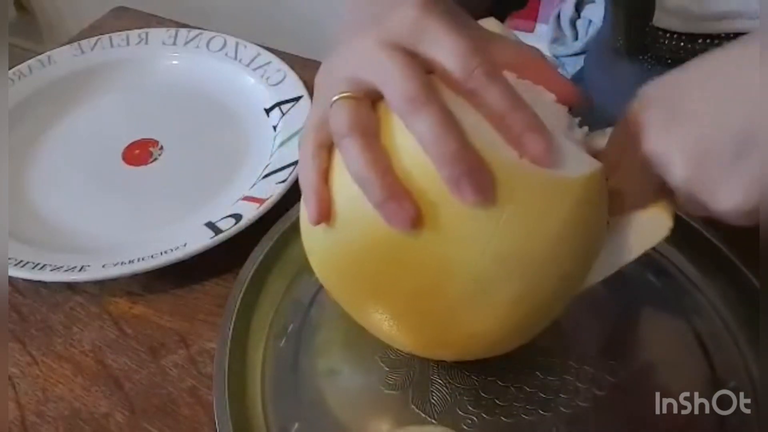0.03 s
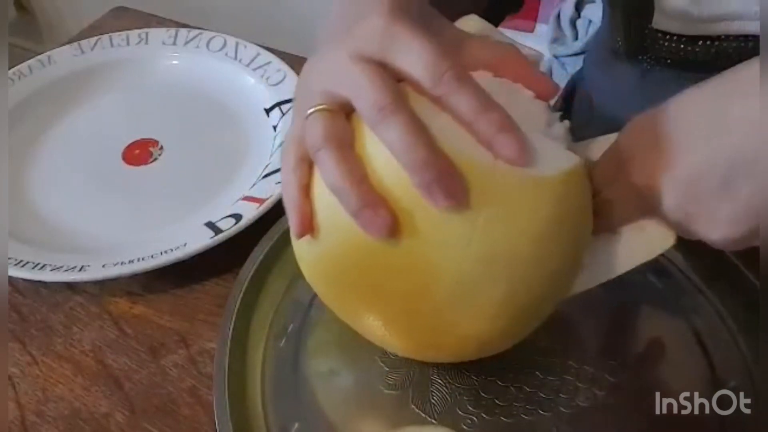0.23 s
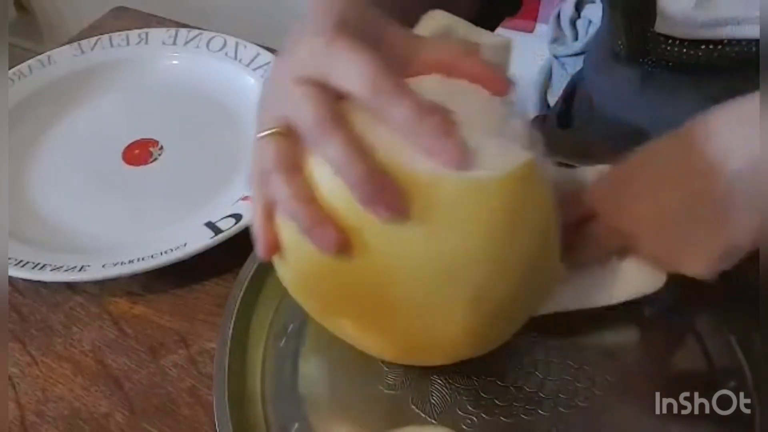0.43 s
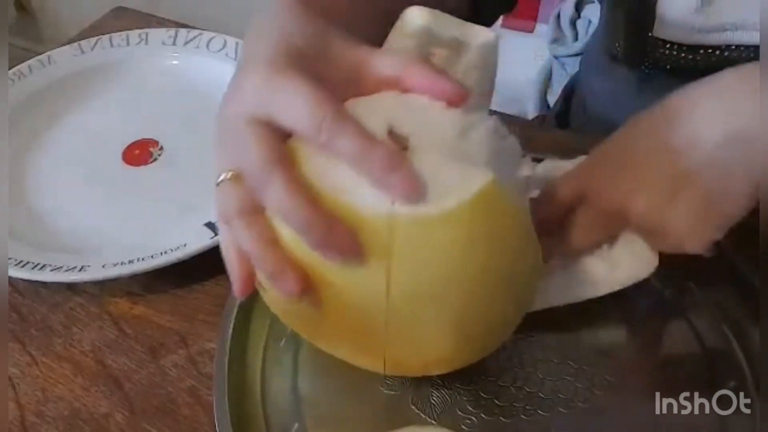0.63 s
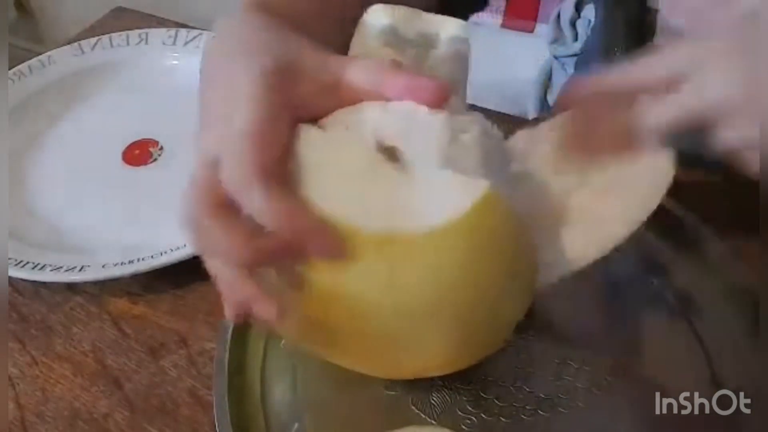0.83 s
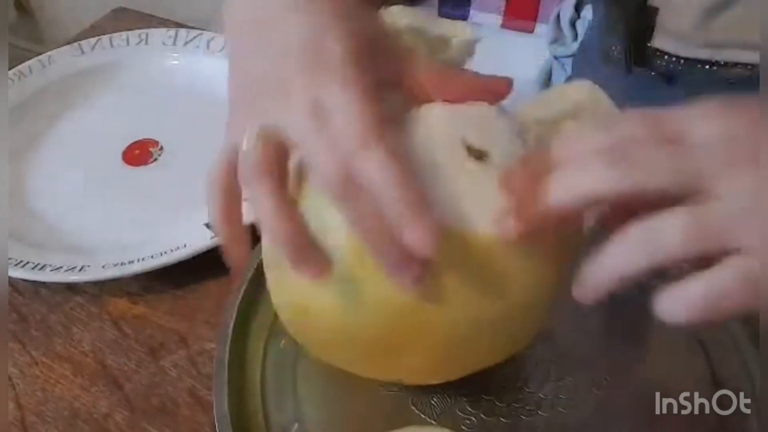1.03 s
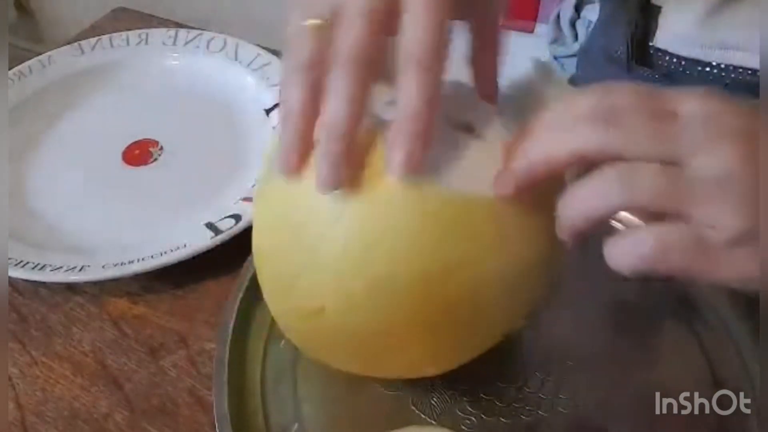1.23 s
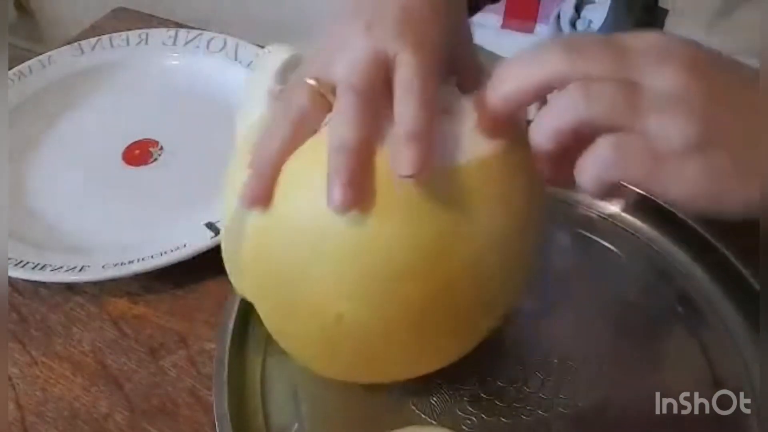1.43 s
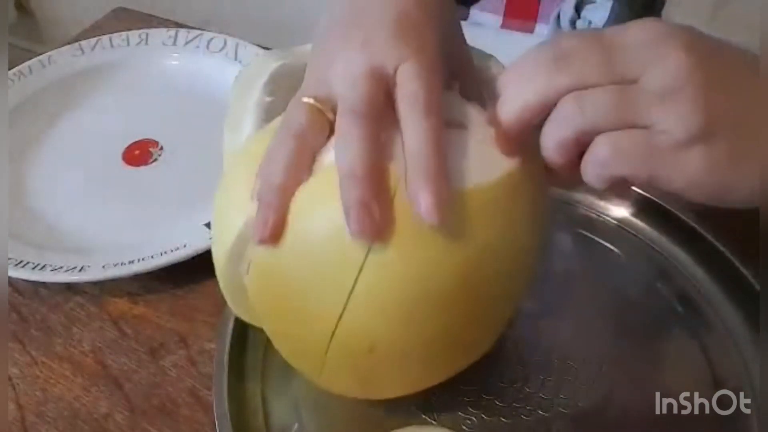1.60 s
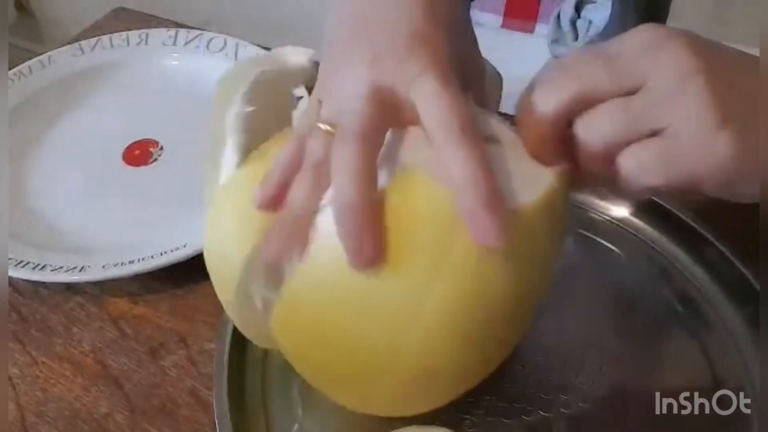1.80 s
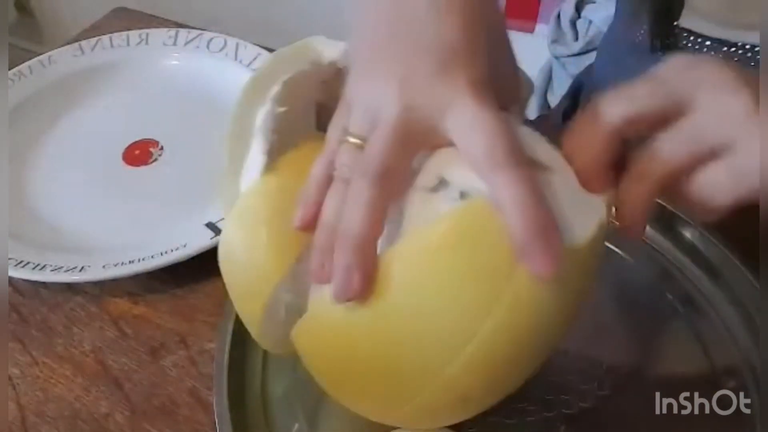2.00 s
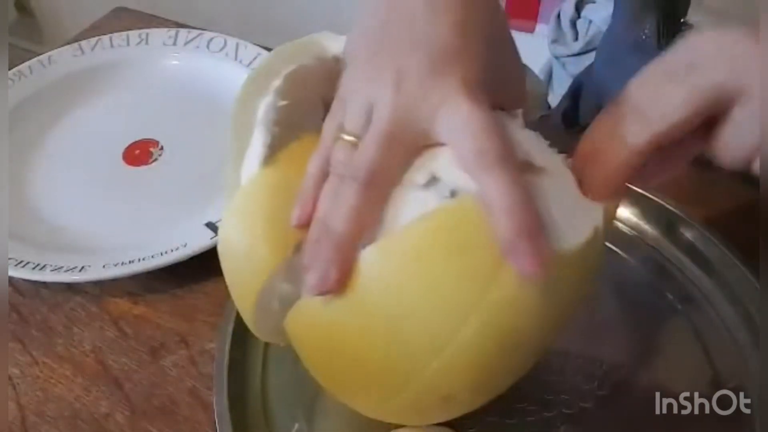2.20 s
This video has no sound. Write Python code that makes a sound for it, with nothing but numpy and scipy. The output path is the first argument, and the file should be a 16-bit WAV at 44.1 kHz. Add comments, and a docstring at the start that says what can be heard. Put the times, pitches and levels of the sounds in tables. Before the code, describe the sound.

Thick pomelo rind crackles and tears off by hand, close up, and the fruit thumps a metal tray that rings faintly. After a dull tap, the rind cracks again with two thin squeaks in a quiet room.

```python
"""Pith crackles and tears as a thick pomelo rind is prised off over a metal tray. It gives way and
the fruit thumps the tray, which rings on; a piece of peel is put down with a dull tap.
The fruit is turned and gripped again: fibres snap, the rind cracks, and two thin rising squeaks
carry through the room. A low hum stands behind it all."""
import sys
import numpy as np
from scipy import signal
from scipy.fft import rfft, irfft, next_fast_len
from scipy.io import wavfile
from scipy.ndimage import map_coordinates

SR = 44100
rng = np.random.default_rng(int(sys.argv[2]) if len(sys.argv) > 2 else 0)


def generate_wav(signal):
    """Clip the signal to [-1, 1] and save it as 16-bit WAV at the path in sys.argv[1]."""
    frames = np.transpose(np.atleast_2d(signal))
    scaled = np.clip(frames, -1, 1) * 32767
    pcm = np.round(scaled).astype(np.int16)
    wavfile.write(sys.argv[1], SR, pcm)


N = 103635

# The hum's tones. Each row: pitch in Hz, level in dB.
HUM_TONES = [(161.5, -89.5), (543.7, -71), (640.6, -73)]
# EQ of the room air. Each row: frequency in Hz, gain in dB.
AIR_EQ = [(25, -9), (50, -4.5), (90, -8.5), (200, -15), (400, -17.5), (580, -10), (800, -19), (1200, -28.5),
          (2000, -43.5), (3200, -33.5), (5000, -42.5), (7500, -31.5), (10000, -36.5), (13000, -33)]
# Swell of the tearing pith. Each row: time in seconds, level in dB.
TEAR_LEVELS = [(0, -45), (.03, -53), (.07, -68), (.1, -60), (.17, -57), (.19, -38.5), (.222, -42.5),
               (.245, -37.5), (.275, -35.5), (.295, -34), (.32, -36), (.35, -48.5), (.4, -56.5),
               (.55, -65.5), (.66, -82), (1.78, -80.5), (1.825, -44.5), (1.87, -52.5), (1.93, -58.5),
               (2.0, -104), (2.35, -70.5)]
# EQ of the tear. Each row: frequency in Hz, gain in dB.
TEAR_EQ = [(60, -10.5), (200, -10), (300, -2), (550, -0.5), (1000, 6), (2000, 2), (3000, -4), (5000, -8.5),
           (8500, -11.5), (10000, -21), (12000, -15.5), (14000, -25.5)]
# Band edges of the crackle in Hz, from coarse fibres to fine.
FIBRE_EDGES_HZ = [150, 800, 1700, 3200, 6500, 14000]
# The fruit rolling under the hand. Each row: time in seconds, level in dB.
ROLL_LEVELS = [(0, -56), (.12, -75.5), (.2, -54), (.28, -50.5), (.4, -72), (.5, -70.5), (.85, -70),
               (1.1, -89), (1.8, -67.5), (1.85, -51), (1.95, -76), (2.15, -90), (2.3, -76)]
# EQ of its rumble. Each row: frequency in Hz, gain in dB.
ROLL_EQ = [(25, -23.5), (50, -7), (80, -2), (150, -14.5), (400, -11.5), (700, -14.5), (2000, -46),
           (8000, -85.5)]
# Fibres snapping. Each row: start in seconds, level in dB, tilt in dB per octave, length in seconds.
FIBRE_SNAPS = [(.009, -41, -6.5, 0.0067), (0.0192, -44, -13.5, 0.0048), (0.044, -56, -17, 0.006),
               (0.1099, -48, -3, .003), (0.1388, -44.5, 0.5, 0.007), (0.147, -47, -12, 0.0027),
               (.179, -41, -6, 0.0046), (0.184, -41.5, -6, 0.0021), (.186, -28, 17, 0.0028),
               (.1995, -48, -7, 0.00067), (.208, -39, 21, 0.0013), (0.2203, -36.5, -2, 0.00133),
               (0.232, -35.5, 6.5, .002), (0.2375, -32, -4.5, .003), (0.287, -27.5, -2, 0.009),
               (0.378, -41, -8.5, 0.0036), (0.597, -48.5, 12.5, 0.00076), (0.606, -57.5, 11, 0.0016),
               (0.837, -49, 9.5, 0.0089), (0.991, -68, 2, 0.0027), (1.513, -53, -2, 0.0032),
               (1.5714, -42.5, -1, 0.0052), (1.579, -45, 1, 0.006), (1.587, -50, -13, 0.0046),
               (1.602, -36.5, -0.5, 0.0021), (1.681, -41, 4.5, 0.0087), (1.69, -40, 8, 0.0043),
               (1.6966, -40.5, 4, 0.0022), (1.7, -52, -15, 0.0014), (1.7305, -29, 1.5, 0.006),
               (1.776, -50.5, -2.5, 0.0071), (1.8155, -26.5, -0.5, 0.0052), (1.819, -35, -1.5, 0.0047),
               (1.847, -32, -6.5, 0.0035), (2.03, -42, -5, 0.0094), (2.2123, -40.5, -6, 0.0036),
               (2.252, -53.5, -7.5, 0.0076), (2.279, -53.5, -7.5, 0.0012), (2.305, -62, 5, 0.0017)]
# EQ of a snap. Each row: frequency in Hz, gain in dB.
SNAP_EQ = [(100, -22.5), (350, -25.5), (600, -9.5), (1000, -15), (2100, -5), (3000, -3), (4800, -0.5),
           (7000, 0.5), (8800, -2.5), (10000, -11.5), (11800, -7), (14000, -6.5)]
# Knocks of the rind. Each row: start in seconds, level in dB, tilt in dB per octave.
RIND_KNOCKS = [(0.0223, -48, 1.5), (0.1579, -40, 1.5), (.192, -48, 0), (.238, -41, 1), (.2575, -40, 4.5),
               (.291, -24.5, -4.5), (.2975, -32, 10), (0.3329, -36, -1), (.3435, -43, 2.5),
               (1.8158, -27.5, 2), (1.846, -42.5, -15), (1.8906, -47, 6)]
# The rind's hollow note. Each row: pitch in Hz, relative level in dB, 60 dB decay in seconds.
RIND_MODES = [(405.4, -5.5, 0.085), (777, -0.5, 0.051), (1275, -5, .025), (1544, 4, .035), (1714, 2, 0.022),
              (1936, -13, .025), (3100, -16.5, 0.017)]
# EQ of the rind's rasp and scuff. Each row: frequency in Hz, gain in dB.
RASP_EQ = [(100, -24), (350, -4), (800, 5), (1600, 1.5), (2500, -9.5), (4000, -12.5), (12000, -21)]
# The fruit landing on the tray. Each row: start in seconds, gain in dB.
FRUIT_THUMPS = [(0.2907, -27), (0.3023, -27.5)]
# The table's boom. Each row: pitch in Hz, relative level in dB, 60 dB decay in seconds.
BOOM_MODES = [(68.5, -21, 0.46), (83.7, -21.5, 0.49), (135, -13.5, 0.12), (197, -0.5, 0.22),
              (221, -3.5, 0.28), (317, -3, .2), (378.8, 2, 0.18), (405, 4.5, .12), (452, -1.5, 0.041),
              (564.6, -5, .13)]
# EQ of the thud. Each row: frequency in Hz, gain in dB.
THUD_EQ = [(25, -17.5), (50, -16), (75, 6.5), (150, -13), (400, -12.5), (700, -16.5), (2000, -33.5),
           (8000, -78.5)]
# The tray's long ring. Each row: pitch in Hz, level in dB, 60 dB decay in seconds.
METAL_MODES = [(169, -57.5, 2.74), (712, -43, 0.94), (791, -68, .8), (1007, -55.5, .3), (1207, -55.5, 1.82),
               (1229, -56.5, 1.8), (1728, -66.5, 1.2), (1850, -61.5, 0.9), (2966, -74.5, .6)]
# Peel put down on the table. Each row: start in seconds, level in dB.
PEEL_TAPS = [(.798, -61.5), (.831, -59), (0.8404, -41.5)]
# A tap's dull note. Each row: pitch in Hz, relative level in dB, 60 dB decay in seconds.
PEEL_MODES = [(313, -9.5, 0.062), (665, -4.5, 0.055), (813, 4.5, 0.031), (1247, 1, 0.031),
              (1430, -14, 0.012), (1880, -12, 0.068), (2890, -14.5, 0.045)]
# The two squeaks. Each row: start in seconds, level in dB before the mix.
SQUEAK_CUES = [(1.773, -33.5), (1.962, -33)]
# The room's reverb. Each row: frequency in Hz, 60 dB decay in seconds.
ROOM_DECAY = [(100, 0.12), (300, 0.26), (800, 0.29), (2000, 0.32), (5000, 0.33), (12000, 0.31)]
# EQ of the whole mix. Each row: frequency in Hz, gain in dB.
BAND_EQ = [(20, -11), (38, -14.5), (62, -0.5), (12700, 0), (13200, -12), (13700, -21), (15000, -40.5)]


def amp(db):
    """Decibels to gain."""
    return 10 ** (np.asarray(db) / 20)


def unit(x):
    """Scale to rms 1."""
    return x / np.sqrt(np.mean(x ** 2) + 1e-20)


def punch(x):
    """Give a hit the energy of 5 ms at rms 1."""
    return unit(x) * np.sqrt(.005 * SR / x.shape[-1])


def along(points, hz):
    """Read (Hz, value) points on a log frequency axis."""
    freqs, values = np.transpose(points)
    return np.interp(np.log(hz + 1), np.log(freqs + 1), values)


def fader(rows):
    """Gain per sample from (seconds, dB) points."""
    return amp(np.interp(np.arange(N) / SR, *np.transpose(rows)))


def wobble(rate):
    """A smooth random curve with rate knots a second."""
    return map_coordinates(rng.standard_normal(N), [np.arange(N) * rate / SR])


def add(track, start, x):
    """Mix x into the track at start seconds."""
    i = max(0, round(start * SR))
    track[..., i:i + x.shape[-1]] += x[..., :N - i]


def stereo_noise(alike, size):
    """White noise whose two channels correlate by alike."""
    mid, side = rng.standard_normal((2, size))
    turn = np.arccos(alike) / 2
    return np.cos(turn) * mid + np.sin(turn) * np.array([side, -side])


def eq(x, points, tilt_db=0):
    """Causal EQ through (Hz, dB) points, tilted per octave above 1400 Hz."""
    n = x.shape[-1]
    size = 2 * next_fast_len(n)
    hz = np.fft.rfftfreq(size, 1 / SR)
    octaves = np.log2(np.maximum(hz, 1400) / 2000)
    cepstrum = irfft(np.log(amp(along(points, hz) + tilt_db * octaves)))
    cepstrum[1:size // 2] *= 2  # minimum phase keeps attacks crisp
    cepstrum[size // 2 + 1:] = 0
    return irfft(rfft(x, size) * np.exp(rfft(cepstrum)))[..., :n]


def fade(t, t60):
    """Exponential decay by 60 dB in t60 seconds."""
    return np.exp(-np.log(1000) * t / t60)


def ring(modes, t, tilt_db=0):
    """Damped sines, tilted per octave."""
    return sum(amp(db + tilt_db * np.log2(hz / modes[0][0])) * fade(t, t60) * np.sin(2 * np.pi * hz * t)
               for hz, db, t60 in modes)


def room_tone():
    """A bed of slightly unsteady hum and soft air."""
    hum, t = np.zeros(N), np.arange(N) / SR
    for hz, db in HUM_TONES:
        waver = 1 + .18 * (wobble(20) + 1j * wobble(9.5))  # in level and phase
        hum += np.sqrt(2) * amp(db) * np.real(waver * np.exp(2j * np.pi * hz * t))
    return hum + amp(-67.5) * unit(eq(stereo_noise(.47, N), AIR_EQ))


def pith_tear(band_breaks_per_s=450, spread_db=2):
    """Countless fibres break at random under the pull, coarse ones low and fine ones high."""
    crackle = np.zeros((2, N))
    for band in zip(FIBRE_EDGES_HZ, FIBRE_EDGES_HZ[1:]):
        breaks = rng.random(N) < band_breaks_per_s / SR
        strength = amp(spread_db * rng.standard_normal(N).clip(-2, 1))
        bandpass = signal.butter(2, band, "bandpass", fs=SR, output="sos")
        crackle += signal.sosfilt(bandpass, breaks * strength * stereo_noise(.37, N))
    return fader(TEAR_LEVELS) * unit(eq(crackle, TEAR_EQ))


def fruit_roll():
    """The tray rumbles under the rolling fruit."""
    return fader(ROLL_LEVELS) * unit(eq(stereo_noise(.9, N), ROLL_EQ))


def fibre_snaps():
    """Each bundle of fibres parts in a burst that swells and dies within milliseconds."""
    out, t = np.zeros((2, N)), np.arange(2048) / SR
    for start, db, tilt, length in FIBRE_SNAPS:
        age = 2 * t / length
        burst = stereo_noise(.4, len(t)) * age * np.exp(-age * age)
        add(out, start, amp(db) * punch(eq(burst, SNAP_EQ, tilt)))
    return out


def rind_hit(modes, samples, rasp_db, tilt_db=0, rise_s=.00021):
    """One bump of rind: a ringing body with a short rasp on top."""
    t = np.arange(samples) / SR
    rasp = eq(stereo_noise(.43, samples) * fade(t, t60=.04), RASP_EQ, tilt_db)
    body = punch(ring(modes, t, tilt_db)) + amp(rasp_db) * punch(rasp)
    return punch(body * (1 - np.exp(-t / rise_s)))


def rind_knocks():
    """The stiff rind springs or bumps with a hollow, raspy knock."""
    out = np.zeros((2, N))
    for start, db, tilt in RIND_KNOCKS:
        add(out, start, amp(db) * rind_hit(RIND_MODES, samples=4096, rasp_db=-.5, tilt_db=tilt))
    return out


def fruit_landing(rise_s=.0013):
    """The heavy fruit lands twice in quick succession and the table thuds."""
    out, t = np.zeros((2, N)), np.arange(N) / SR
    attack = 1 - np.exp(-t / rise_s)
    for start, db in FRUIT_THUMPS:
        thud = unit(eq(stereo_noise(1, N), THUD_EQ)) * fade(t, t60=.29)
        add(out, start, amp(db) * attack * (ring(BOOM_MODES, t) + amp(-6) * thud))
    return out


def tray_ring():
    """The metal tray rings on from the first thump."""
    out = np.zeros(N)
    add(out, FRUIT_THUMPS[0][0], ring(METAL_MODES, np.arange(N) / SR))
    return out


def peel_taps():
    """Soft peel meets the table with a dull, short note and a scuff."""
    out = np.zeros((2, N))
    for start, db in PEEL_TAPS:
        add(out, start, amp(db) * rind_hit(PEEL_MODES, samples=8192, rasp_db=-6))
    return out


def squeaks(length_s=.113):
    """A wavering whistle climbs, swells and levels off; at its loudest the octave below joins it."""
    out, progress = np.zeros(N), np.linspace(0, 1, int(length_s * SR))
    swell_db = np.interp(progress, [0, .54, 1], [-22.5, 0, -.5])
    swell = amp(swell_db) * signal.windows.tukey(len(progress), .1)
    glide_hz = np.interp(progress, [0, .84], [4070, 5600])
    for start, db in SQUEAK_CUES:
        hz = glide_hz * (1 + .036 * wobble(700)[:len(progress)])
        phase = 2 * np.pi * np.cumsum(hz) / SR
        whistle = np.sin(phase) + amp(-26) * np.sin(2 * phase)
        sub_and_fifth = amp(-23) * np.sin(phase / 2) + amp(-24) * np.sin(1.5 * phase)
        add(out, start, np.sqrt(2) * amp(db) * swell * (whistle + swell * sub_and_fifth))
    return out


def reverb(x, decay_scale=1, predelay_s=.008):
    """The room's answer: a diffuse tail for each ear, each frequency dying at its own speed."""
    hz, t, spectrum = signal.stft(rng.standard_normal((2, SR // 2)), SR, nperseg=256)
    decay = fade(t, decay_scale * along(ROOM_DECAY, hz)[:, None])
    tail = signal.istft(spectrum * decay, SR, nperseg=256)[1]
    tail = np.pad(tail / np.linalg.norm(tail[0]), ((0, 0), (int(predelay_s * SR), 0)))
    return signal.fftconvolve(np.atleast_2d(x), tail, axes=1)[:, :N]


def scene():
    """The fruit sits close and a little right; the squeaks come from the left, mostly as reverb."""
    snap, knock, thump = fibre_snaps(), rind_knocks(), fruit_landing()
    tap, squeak = peel_taps(), squeaks()
    pith = snap + pith_tear()
    send = amp(-6.5) * pith + amp(-8.5) * knock + amp(-9.5) * thump + amp(-3.5) * tap
    tail = reverb(send)
    early_reflections = amp(-12) * reverb(snap, decay_scale=.1)
    near = pith + knock + thump + tap + fruit_roll() + tray_ring()
    near += tail + early_reflections + room_tone()
    direct = np.array([squeak, np.roll(squeak, 3)])  # reaches the right ear 3 samples late
    far = amp(-8) * direct + amp(-1) * reverb(squeak, decay_scale=.74, predelay_s=0)
    pan_right, pan_left = amp([[-1.04], [1.04]]), amp([[1.1], [-1.1]])
    return near * pan_right + far * pan_left


def record(dry):
    """Deep bass and treble above 13 kHz fall away; a steep high cut follows."""
    high_cut = signal.ellip(10, .2, 80, 15060, fs=SR, output="sos")
    return signal.sosfilt(high_cut, eq(dry, BAND_EQ))


dry = scene()
out = record(dry)
generate_wav(out)
```